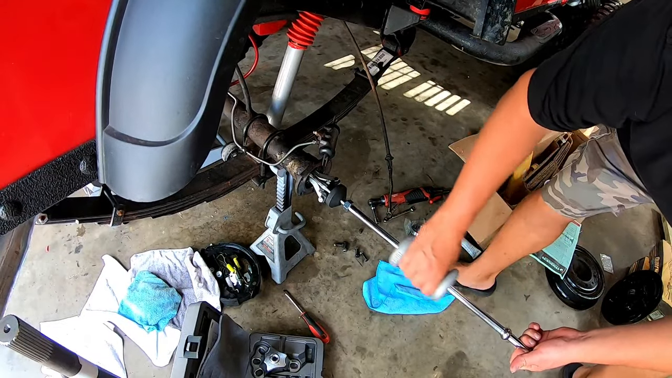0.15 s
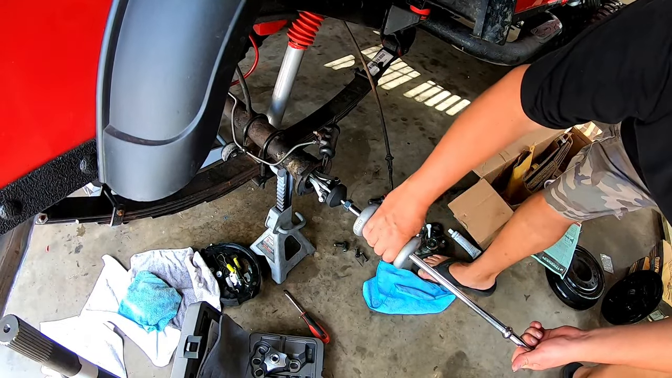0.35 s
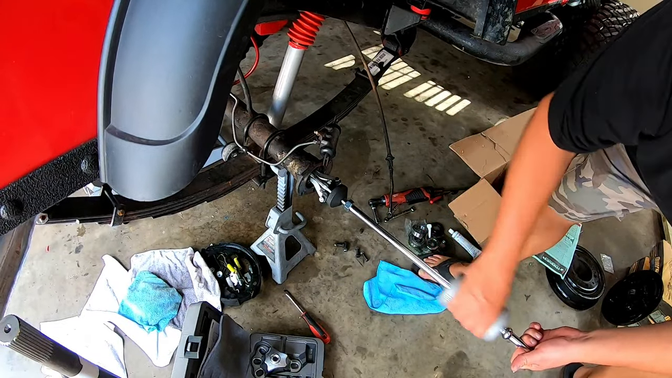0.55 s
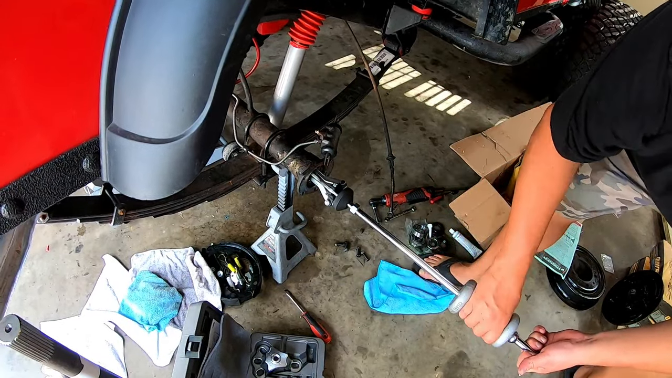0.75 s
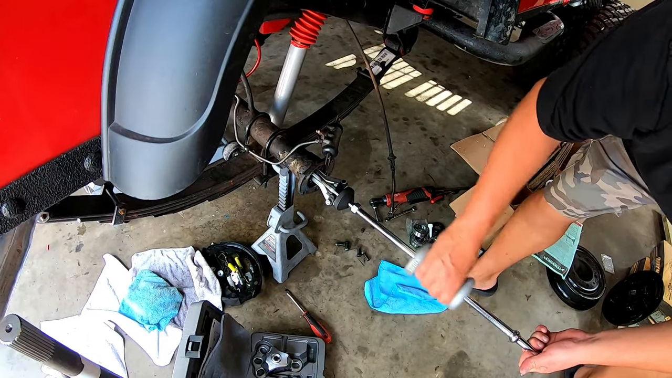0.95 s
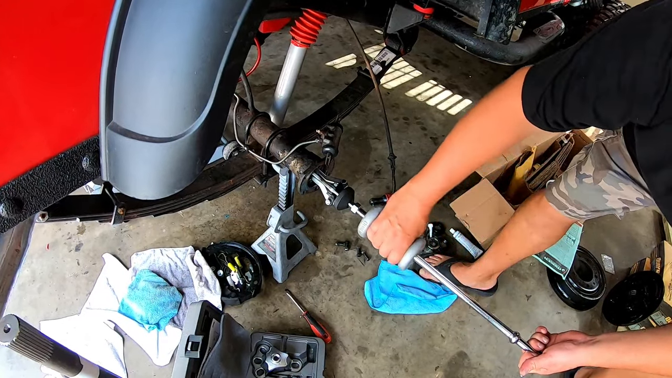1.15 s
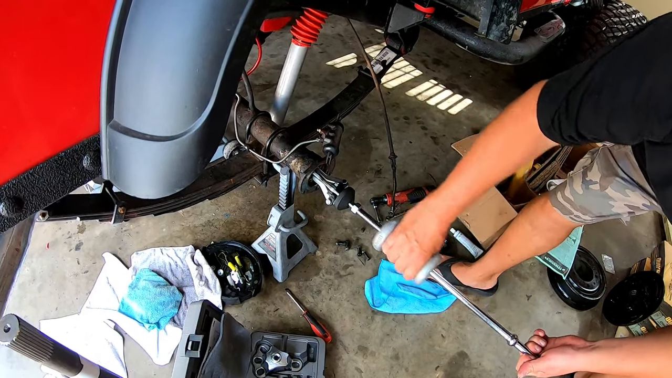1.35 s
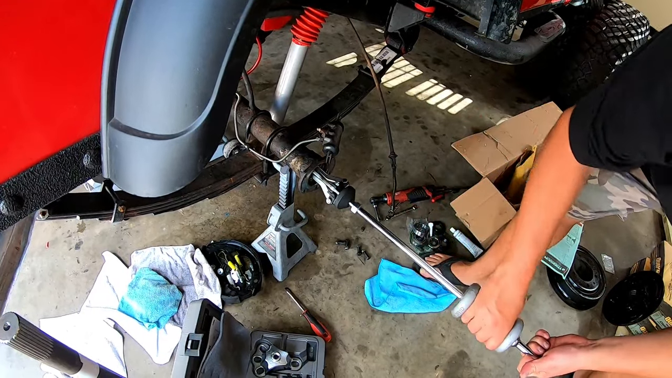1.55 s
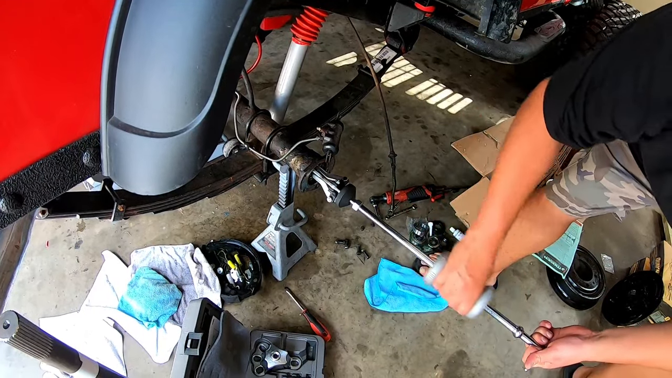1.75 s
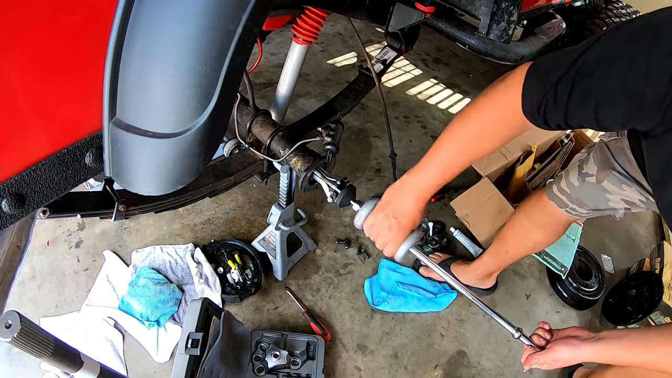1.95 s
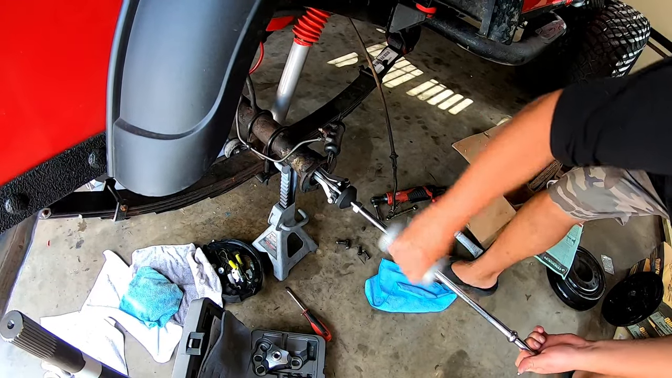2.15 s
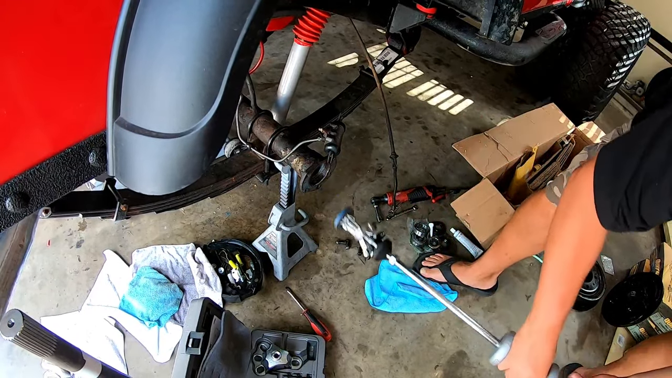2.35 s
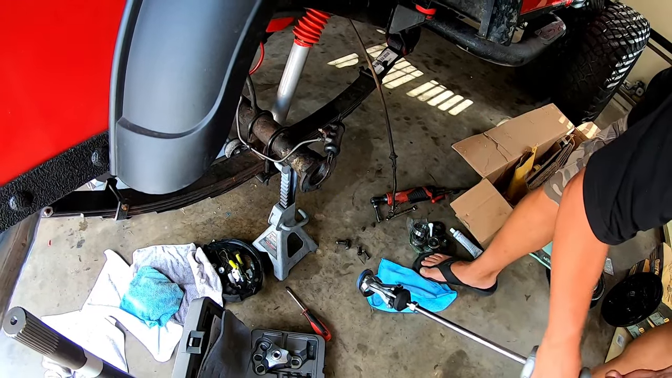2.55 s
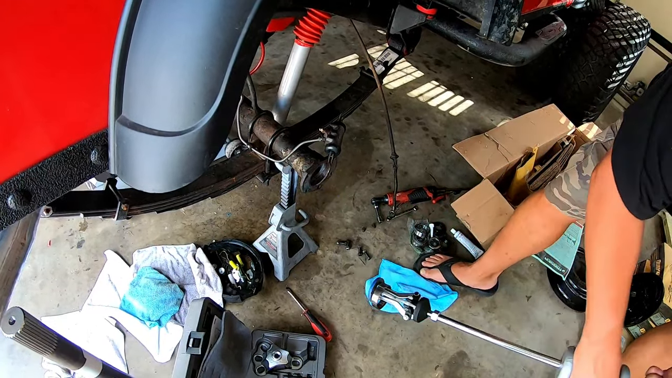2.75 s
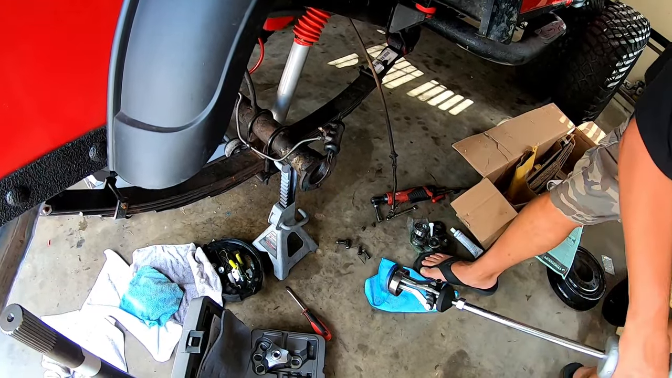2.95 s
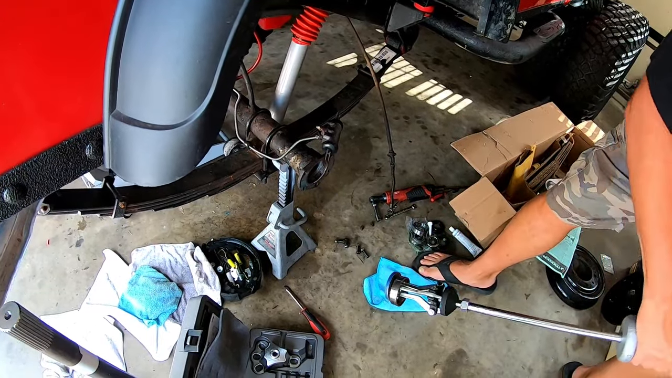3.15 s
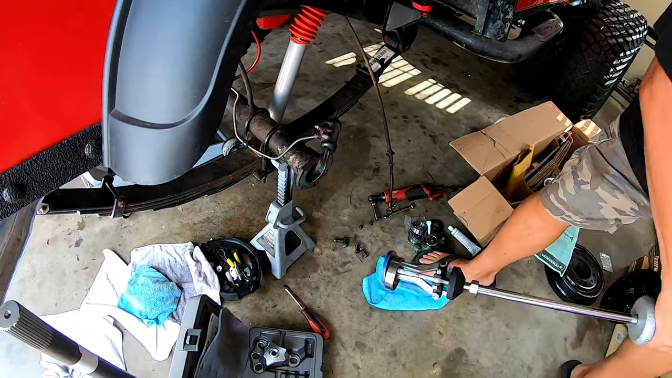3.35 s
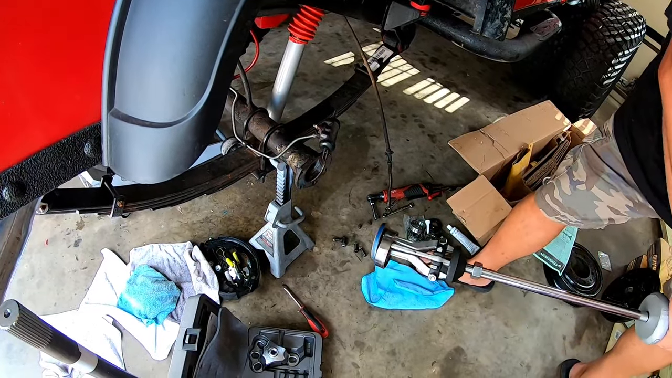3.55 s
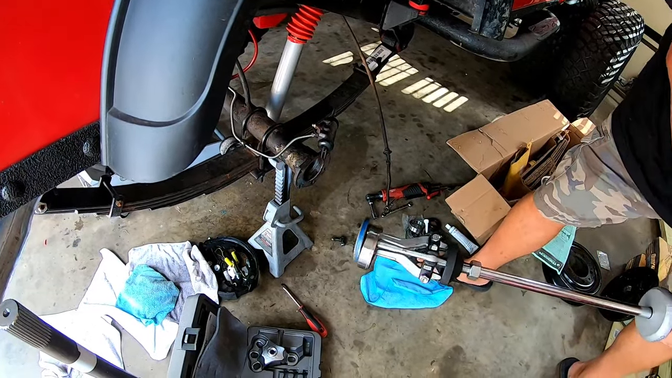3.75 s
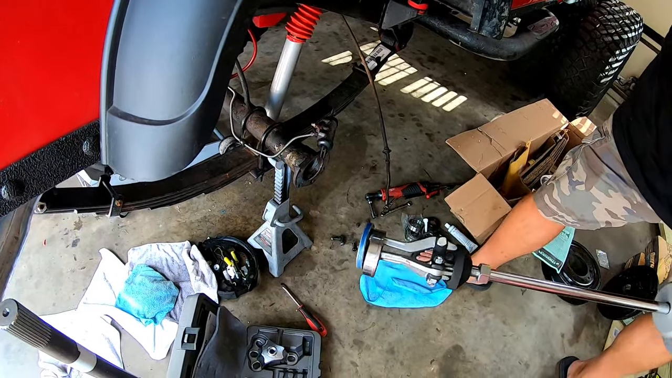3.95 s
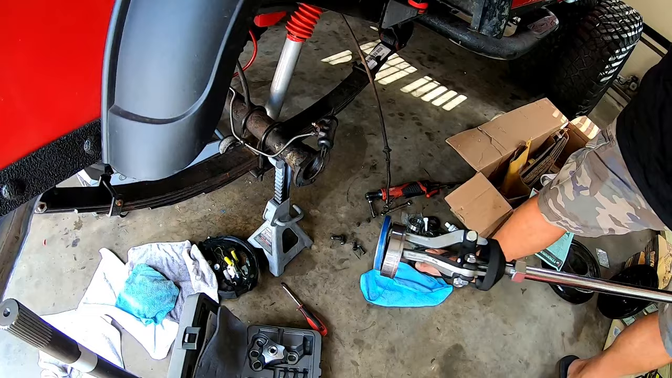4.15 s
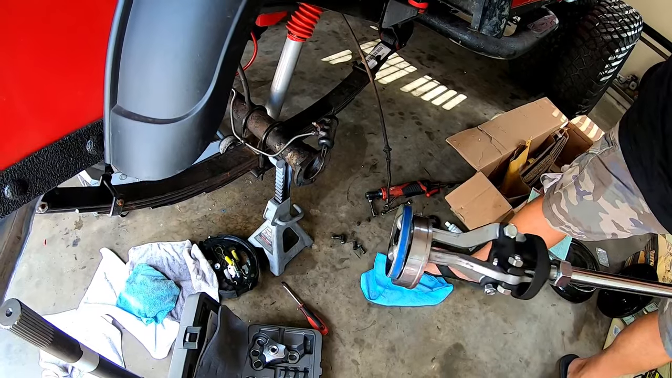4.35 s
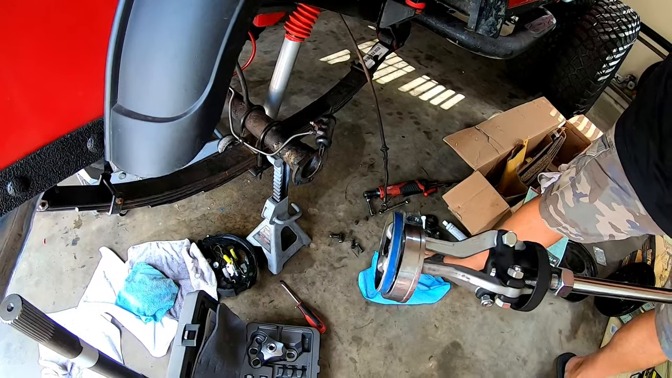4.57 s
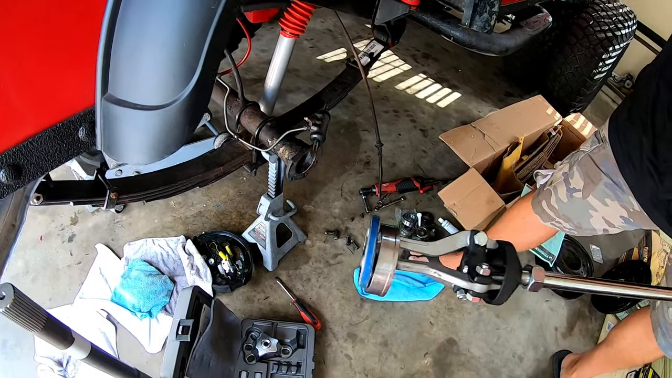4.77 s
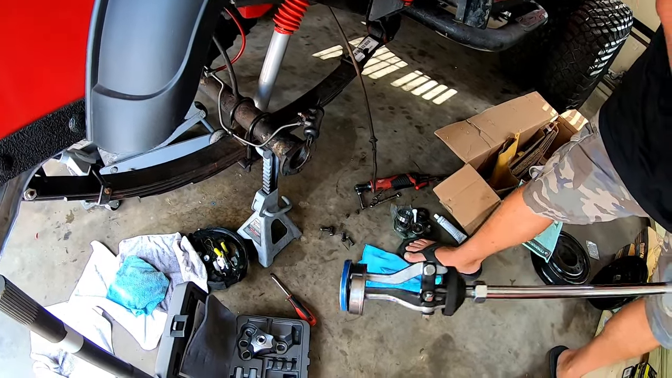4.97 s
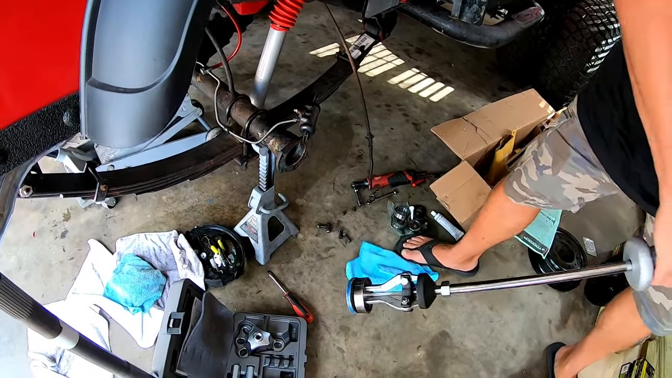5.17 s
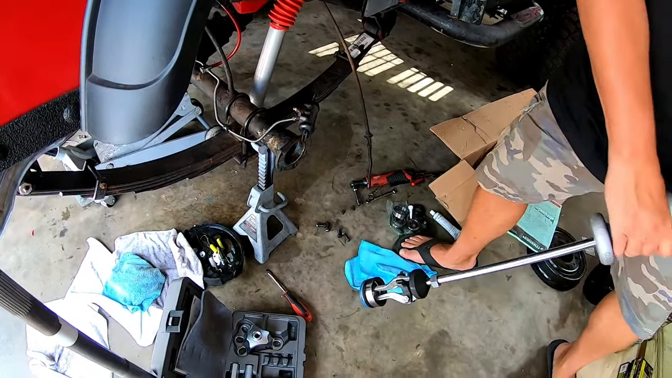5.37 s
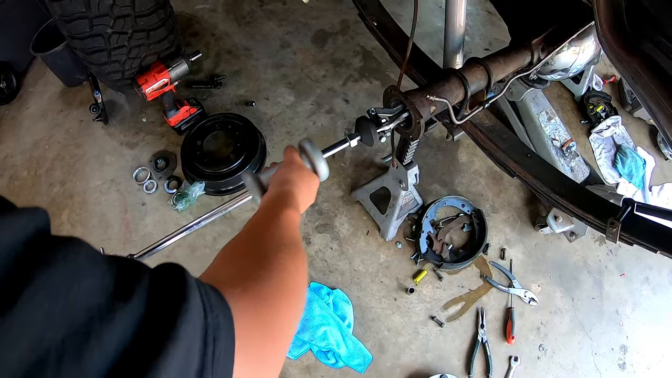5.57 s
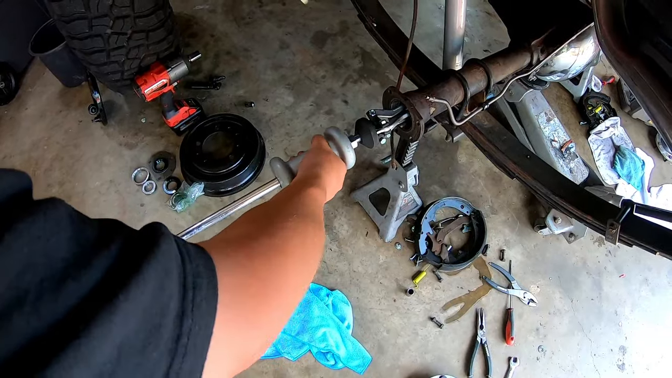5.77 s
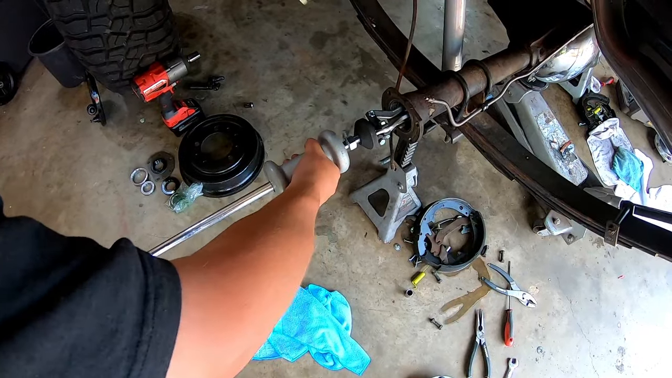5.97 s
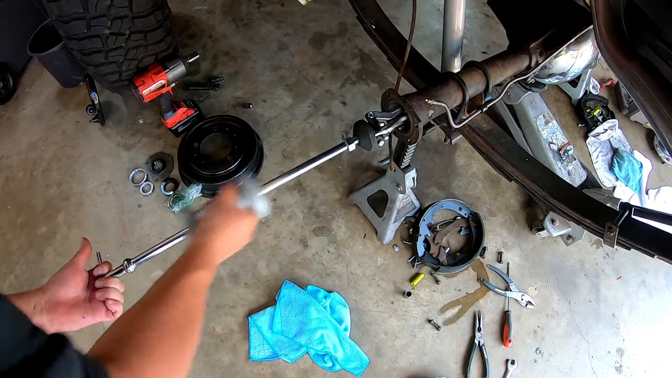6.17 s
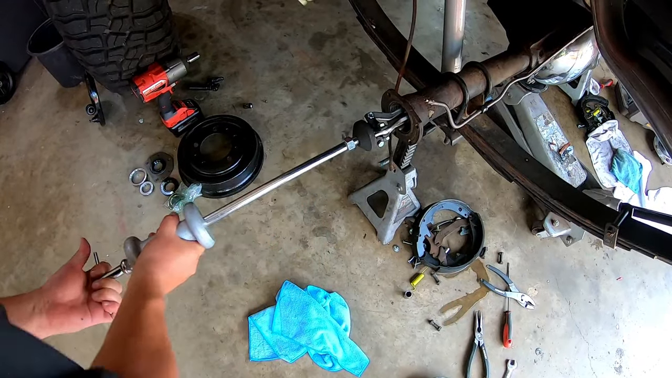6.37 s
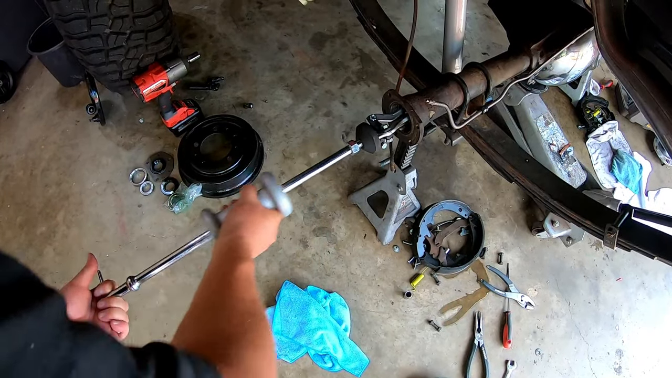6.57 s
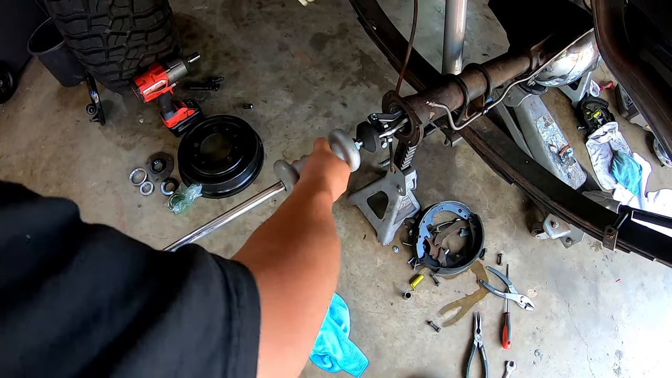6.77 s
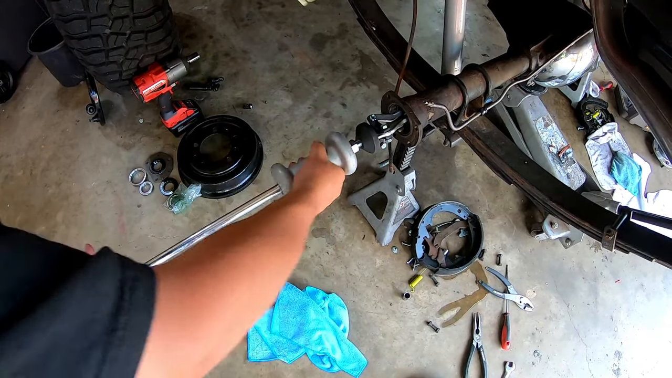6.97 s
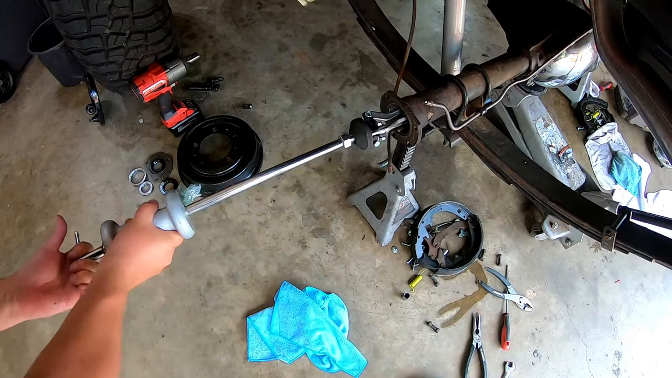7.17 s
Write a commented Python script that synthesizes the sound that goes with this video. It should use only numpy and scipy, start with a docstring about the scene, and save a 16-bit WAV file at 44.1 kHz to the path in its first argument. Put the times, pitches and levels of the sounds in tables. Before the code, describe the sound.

In an open garage, a steel slide hammer pulls at a truck axle. Short rising metal scrapes end in sharp, bright, ringing clacks with a dull body thud, three blows under a second apart. Then about four quieter seconds: light knocks, small clinks of loose jaws, a distant low motor drone and air. Two more scraping blows follow. Close stereo microphone, loud peaks briefly squashed.

```python
"""A slide hammer pulls a bearing from a truck axle in a garage: the weight scrapes along its rod and slams into the stop.
Each blow sums a noise burst for the contact, dense decaying noise for the steel, ringing modes, thud, boom and shake.
The scrape is noise with gliding resonances; light knocks ring the rod, the freed jaws clink, and two small clicks follow.
A far motor (wavering sines and noise) drones over noise for air and rumble; a gain control ducks after loud peaks."""
import sys
import numpy as np
from scipy import signal
from scipy.fft import rfft, irfft, next_fast_len
from scipy.io import wavfile
from scipy.ndimage import uniform_filter1d, map_coordinates

SR = 44100
rng = np.random.default_rng(int(sys.argv[2]) if len(sys.argv) > 2 else 0)


def dump(signal):
    """Clip the signal to [-1, 1] and save it as 16-bit WAV at the path in sys.argv[1]."""
    limited = np.clip(np.atleast_2d(signal).T, -1, 1)
    pcm = np.round(limited * 32767).astype(np.int16)
    wavfile.write(sys.argv[1], SR, pcm)


N = 318402
TIME = np.arange(N) / SR  # s from the start of the scene
AGE = np.arange(SR * 5 // 4) / SR  # s from the start of one impact
TOP_HZ = 15800  # upper band limit

# Modes of rod and weight: pitch_hz, relative level_db, t60_s
ROD_MODES = [(967, -19.5, 0.6), (2049, -16, 0.79), (2556, -11, 0.46), (2920, -12, 0.44), (3070, -3, 0.55),
             (3890, -9, .5), (4016, -1.5, 0.62), (4000, -7, 0.69), (5100, -12.5, 0.34), (6200, -11, .45),
             (7150, -16, 0.45), (7640, -5.5, 0.29), (7800, -1, 0.29), (9500, -15, .25)]
# Modes of the puller jaws hanging free: pitch_hz, relative level_db, t60_s
JAW_MODES = [(1565, -2, .35), (2100, -9, .3), (2600, -7, .4), (3149, -8, .5), (3562, 1, .7), (4740, -4, .4),
             (5905, -4, .7), (6245, -10, .4), (9810, -6, .6), (14212, -30, .5)]
# Where the steel's modes crowd or thin out: pitch_hz, width_hz, change_db
MODE_CLUSTERS = [(2793, 69, 2), (4120, 84, -2.5), (6140, 83, 4), (7750, 530, 11), (8410, 1800, -3.5),
                 (9460, 180, 7.5)]
# Reverberation time of the garage: pitch_hz, t60_s
GARAGE_T60 = [(150, .6), (500, 0.93), (1500, 0.88), (3000, 0.68), (7000, 0.61), (14000, 0.44)]
# Left-right likeness of the ringing and scraping: pitch_hz, correlation (no unit)
RING_ALIKE = [(250, 0.84), (640, 0.9), (1400, 0.31), (3000, 0.89), (6800, 0.052), (12000, 0.11)]
# Left-right likeness of the background: pitch_hz, correlation (no unit)
FLOOR_ALIKE = [(30, 0.79), (100, 1), (200, 1), (600, 0.88), (3000, 0.9)]


def amp(db):
    """Level law: decibels to amplitude gain."""
    return 10 ** (np.asarray(db) / 20)


def unit(x):
    """Power normalisation: scale to rms 1."""
    return x / np.sqrt(np.mean(x ** 2) + 1e-20)


def along(points, hz):
    """Interpolation of (pitch_hz, value) points on a logarithmic frequency axis."""
    point_hz, value = np.transpose(points)
    return np.interp(np.log(hz + 1), np.log(point_hz + 1), value)


def fade(t, t60):
    """Exponential decay of a damped vibration, 60 dB down after t60 seconds."""
    return np.exp(-np.log(1000) * t / np.maximum(t60, 1e-3))


def wobble(rate_hz, size):
    """Random modulation: straight lines between random knots, rate_hz knots a second."""
    knots = rng.standard_normal(int(size * rate_hz / SR) + 4)
    return map_coordinates(knots, [np.arange(size) * rate_hz / SR], order=1)


def add(track, sound, s):
    """Superposition: mix a stereo sound into the track at time s."""
    start = round(s * SR)
    lo, hi = max(start, 0), min(start + sound.shape[1], N)
    if hi > lo:
        track[:, lo:hi] += sound[:, lo - start:hi - start]


def noise(spectrum, alike, size, tilt_db=0, peaks=()):
    """Spectral shaping: rms-1 stereo noise whose mid-side balance sets the left-right correlation."""
    m = next_fast_len(size, True)
    hz = np.fft.rfftfreq(m, 1 / SR)
    # the tilt, in dB per octave, acts above 1 kHz
    db = along(spectrum, hz) + tilt_db * np.log2(np.maximum(hz, 1000) / 1000)
    for centre_hz, width_hz, gain_db in peaks:
        db = db + gain_db / (1 + (2 * (hz - centre_hz) / width_hz) ** 2)
    turn = np.arccos(np.clip(along(alike, hz), -1, 1)) / 2
    spectra = rfft(rng.standard_normal((2, m))) * amp(db) * [np.cos(turn), np.sin(turn)]
    mid, side = irfft(spectra, m)[:, :size]
    return unit(np.array([mid + side, mid - side]))


def blows():
    """Impact: the weight hits the stop and the truck's body thuds; the camera mount shakes."""
    # Hard blows on the stop: start_s, level_db, crack_db, tilt_db_per_octave, strongest_ring_hz, body thud_db,
    # thud_pitch_hz, body boom_db, free jaws_db, right_minus_left_db; part levels are relative
    hard_blows = [(-0.235, -5, 0, 3, 7730, -9.5, 70, -37, -29, 2.5),
                  (0.6908, -13, 11.5, 2.37, 3760, -13.5, 173, -45.5, -51, 1.5),
                  (1.587, -12, 11.5, 1.33, 2700, -5, 135, -27, -40, 2),
                  (2.348, -13.5, 9.5, -0.5, 9780, -10.5, 227, -35, -10, 1),
                  (6.3304, -12.5, 12.5, 1, 2870, -1, 121, -6.5, -33, 0.3),
                  (7.2012, -8, 9.5, -0.5, 3280, -4, 185, -33, -38, -0.5)]
    # Truck body modes: pitch_hz, relative level_db, t60_s
    boom_modes = [(66, 0, 1.2), (131, 3, .4)]
    # Spectrum of the body thud: pitch_hz, relative level_db
    thud_band = [(20, -20), (45, -4), (70, -0.5), (125, -3), (200, -4.5), (260, -12), (350, -26),
                 (600, -36.5), (1500, -93)]
    # Spectrum of the camera mount's low shake: pitch_hz, relative level_db
    shake_band = [(20, -7), (45, -5), (150, -1.5), (300, -10.5), (900, -41.5), (2000, -80.5)]
    out = np.zeros((2, N))
    for s, db, crack_db, tilt_db, centre_hz, thud_db, thud_hz, boom_db, jaws_db, right_db in hard_blows:
        gain = amp(db + right_db * np.array([[-.5], [.5]]))
        steel = amp(-1.5) * clang(tilt_db, early_db=-7, early_t60=0.11, peaks=[(centre_hz, 200, 5)])
        rod = amp(-13) * ring(ROD_MODES, centre_hz, favour_db=2.5, waver_db=4.5)
        jaws = amp(jaws_db) * ring(JAW_MODES, centre_hz, favour_db=7.5, waver_db=9.5)
        thud = noise(thud_band, [(100, .93)], len(AGE), peaks=[(thud_hz, 50, 8)])
        thud = amp(thud_db + 9.0) * thud * fade(AGE, 0.39)
        boom = amp(boom_db) * ring(boom_modes).mean(axis=0)
        body = (thud + boom) * (1 - np.exp(-AGE / 0.011))
        # the shake is partly opposite in the two channels
        shake = amp(-11.0) * noise(shake_band, [(100, -0.46)], len(AGE))
        shake = shake * fade(AGE, .14) * (1 - np.exp(-AGE / 0.0023))
        add(out, gain * (steel + rod + jaws + shake + body), s)
        add(out, gain * amp(crack_db + 4.5) * crack(0, t60=0.022, rise=0.00096), s)
    return out


def crack(tilt_db, t60, rise, peaks=()):
    """Contact transient: stress waves race along the rod, heard as a brief burst; t60 and rise in seconds."""
    # Spectrum of the steel contact: pitch_hz, relative level_db
    contact_band = [(180, -33.5), (300, -17.5), (632, -19), (909, -16.5), (2010, -14), (2710, -1.5),
                    (3040, 2.5), (4520, -14), (5250, -11.5), (7550, -11), (8480, -21), (9670, -7),
                    (10500, -27.5), (12600, -25.5), (15600, -39)]
    # Left-right likeness of the contact: pitch_hz, correlation (no unit)
    contact_alike = [(400, .1), (1300, 1), (2500, 0.33), (3800, 0.49), (5500, .45), (9000, .1)]
    t = AGE[:SR // 10]
    shape = fade(t, t60) * (1 - np.exp(-(t / rise) ** 2))
    burst = noise(contact_band, contact_alike, len(t), tilt_db, peaks) * shape
    return unit(burst) * np.sqrt(np.mean(shape ** 2))


def clang(tilt_db, early_db, early_t60, peaks):
    """High modal density: countless uneven modes merge into noise that decays with the garage's reverberation."""
    # Spectrum of the dense ring of tool and axle: pitch_hz, relative level_db
    clang_band = [(190, -38), (330, -8.5), (590, -12), (958, -11.5), (1070, -13.5), (1260, -11),
                  (1680, -7.5), (3900, -1.5), (4300, -4), (7560, -6.5), (8740, -10.5), (9630, -8),
                  (11000, -19.5), (14700, -29.5), (15600, -58)]
    grid_hz = np.arange(200, TOP_HZ, 70)
    uneven = np.c_[grid_hz, along(clang_band, grid_hz) + 3.6 * rng.standard_normal(len(grid_hz))]
    dense = noise(uneven, RING_ALIKE, len(AGE), tilt_db, MODE_CLUSTERS + peaks)
    hz, t, z = signal.stft(dense, SR, nperseg=256)
    decaying = z * fade(t, along(GARAGE_T60, hz)[:, None])
    tail = signal.istft(decaying, SR, nperseg=256)[1][:, :len(AGE)]
    # the early part shares the tail's decay and fades further by early_t60 (s)
    return tail * (1 + amp(early_db) * fade(AGE, early_t60)) * (1 - np.exp(-AGE / 0.0017))


def ring(modes, centre_hz=3000, favour_db=0, hold=0, waver_db=0, tilt_db=0):
    """Modal synthesis: contact favours modes near centre_hz; a hand damps all by hold dB a second."""
    hz, db, t60 = np.transpose(modes)
    db = db + favour_db / (1 + ((hz - centre_hz) / 200) ** 2)
    db = db + tilt_db * np.log2(np.maximum(hz / centre_hz, 1))
    size = unit(amp(db + 2 * rng.standard_normal(len(hz)))) * np.sqrt(2 / len(hz))
    phase = .6 * rng.standard_normal((2, len(hz)))  # each mode has its own phase in each channel
    turn = (2 * np.pi * hz[:, None] * AGE).astype(np.float32)
    # wall echoes add to each mode and cancel it in turn
    swells = amp(waver_db * rng.standard_normal(size=(len(hz), 70)))
    knots = np.linspace(0, AGE[-1], swells.shape[1])
    waver = np.array([np.interp(AGE, knots, unit(row)) for row in swells], np.float32)
    mode_t60 = np.minimum(t60, AGE[-1])[:, None].astype(np.float32)
    life = waver * fade(AGE.astype(np.float32), mode_t60)
    in_phase = (size * np.cos(phase)) @ (life * np.sin(turn))
    quadrature = (size * np.sin(phase)) @ (life * np.cos(turn))
    return (in_phase + quadrature) * amp(-hold * AGE) * (1 - np.exp(-AGE / .0015))


def slide():
    """Friction: the weight chatters along the rod; its place sets the free length, so bending resonances glide."""
    # Spectrum of the scrape: pitch_hz, relative level_db
    scrape_band = [(290, -37.5), (500, -8), (1320, -13.5), (1960, -0.5), (3180, -4.5), (4050, -3),
                   (4290, -10), (4940, -2), (5460, -16), (6300, -4.5), (8020, -24.5), (8370, -27.5),
                   (9380, -13.5), (10700, -37.5), (15000, -38)]
    level, place = motion()
    modes = [(hz, 60, 5) for hz, _, _ in ROD_MODES]
    chatter = noise(scrape_band, RING_ALIKE, N, peaks=MODE_CLUSTERS + modes)
    hz, t, z = signal.stft(chatter, SR, nperseg=1024)
    length = 1 + .16 * np.interp(t, TIME, place)
    # bending wavenumber grows as the square root of frequency
    bending = np.cos(2 * np.pi * np.sqrt(hz[:, None] / 42) * length)
    # the contact catches and lets go, waking now one mode and now another
    catches = uniform_filter1d(rng.standard_normal(z.shape[1:]), size=4, axis=0)
    catches = unit(uniform_filter1d(catches, size=4, axis=1))
    coloured = z * amp(3.5 * bending + 4 * catches)
    scrape = unit(signal.istft(coloured, SR, nperseg=1024)[1][:, :N])
    flutter = amp(1.8 * wobble(70, N))
    return level * flutter * scrape


def motion():
    """Kinematics: scrape amplitude follows a power of speed; place runs from 0 (axle end) to 1 (stop)."""
    # The weight is flung at the stop, gathering speed all the way: start_s, end_s, full-speed scrape level_db
    pulls = [(0.48, 0.686, -35), (1.386, 1.584, -35.5), (2.11, 2.349, -38.5), (6.11, 6.334, -32.5),
             (7.04, 7.22, -32.5)]
    # The weight is pushed back, speeding up and slowing down: start_s, end_s, full-speed scrape level_db
    returns = [(0.14, 0.5, -44.5), (1.03, 1.33, -53), (1.89, 2.15, -52.5), (5.403, 5.92, -49),
               (6.66, 6.94, -55)]
    pull_power, return_power = 2, 1.83  # exponents of speed
    level, place = np.zeros(N), np.zeros(N)
    for start, end, db in pulls:
        during = (TIME >= start) & (TIME < end)
        speed = (TIME[during] - start) / (end - start)
        level[during] += amp(db) * speed ** pull_power
        place[during] = speed ** 2
    for start, end, db in returns:
        during = (TIME >= start) & (TIME < end)
        swing = np.pi * (TIME[during] - start) / (end - start)
        level[during] += amp(db) * np.abs(np.sin(swing)) ** return_power
        place[during] = (1 + np.cos(swing)) / 2
    return level, place


def garage(x):
    """Diffuse reverberation: convolution with noise that decays at each frequency's own rate."""
    hz, t, z = signal.stft(rng.standard_normal((2, SR)), SR, nperseg=256)
    tail = signal.istft(z * fade(t, along(GARAGE_T60, hz)[:, None]), SR, nperseg=256)[1]
    return signal.fftconvolve(x, tail / np.linalg.norm(tail[0]), axes=1)[:, :N]


def knocks():
    """Damped resonance: the weight bumps the rod and its ends, and the hand damps the ring."""
    # Light knocks: start_s, level_db, crack_db, tilt_db_per_octave, rod_ring_db, strongest_ring_hz;
    # part levels are relative
    rod_knocks = [(0.154, -41, 2.5, -3, -6, 2720), (2.101, -24.5, 0.5, 0, -3.5, 3190),
                  (3.165, -42, -9, -8.5, -3, 4030), (3.235, -40.5, 1, -9, -16, 3170),
                  (3.2414, -29.5, 5.5, -6, -3, 3920), (3.2459, -29, 10, -4.5, -8, 3050),
                  (5.529, -40, -7, -5.5, -29, 4240), (6.223, -35, 1, -5.5, -3, 3970),
                  (6.289, -33.5, -12, -3, 1, 4030), (6.8494, -28, 8, 1.5, -2.5, 4140),
                  (7.087, -44, 5.5, -4, -30, 1780), (7.175, -33.5, 0, 3, -17, 3300)]
    out = np.zeros((2, N))
    for s, db, crack_db, tilt_db, rod_db, centre_hz in rod_knocks:
        rod = ring(ROD_MODES, centre_hz, favour_db=13, hold=15, waver_db=2.5, tilt_db=1.5 * tilt_db)
        add(out, light_contact(db, crack_db, tilt_db, centre_hz, amp(rod_db + 1) * rod), s)
    return out


def light_contact(db, crack_db, tilt_db, centre_hz, ringing):
    """Weak excitation: a tick, a short clang and a modal ring, with the low modes barely moved."""
    colour = [(450, 900, -12), (centre_hz, 300, 7)]  # centre Hz, width Hz, dB
    sound = amp(-5.5) * clang(tilt_db, early_db=8, early_t60=0.16, peaks=colour) + ringing
    tick = amp(crack_db + 5.5) * crack(tilt_db, t60=.035, rise=.0006, peaks=colour)
    padded = np.pad(tick, [(0, 0), (0, len(AGE) - tick.shape[1])])
    return amp(db) * (sound + padded)


def clinks_and_clicks():
    """Damped modes: the freed jaws clink and rattle at random; two small clicks borrow the same modes."""
    # Light events, jaw clinks first and two small clicks last: start_s, level_db, crack_db, tilt_db_per_octave,
    # modal_ring_db, strongest_ring_hz; part levels are relative
    light_events = [(2.777, -58, 10.5, -12.5, -14, 2550), (2.8136, -46.5, 5, -6.5, -1, 3670),
                    (2.908, -51, 0.5, -3.5, -15, 5280), (3.115, -64.5, 1.5, -11.5, 10, 2500),
                    (3.886, -64, -2.5, -15, -4, 3580), (4.018, -49, -0.5, -10, 4.5, 4640),
                    (4.039, -46.5, 4.5, -8, -1.5, 3560), (4.217, -60, 1.5, -12.5, -13, 2620),
                    (4.688, -67.5, -2.5, -10.5, -6.5, 3580), (4.924, -63, 8, -12, -8.5, 3630),
                    (5.189, -65.5, 1.5, -10, -9, 3570), (5.384, -54.5, -9, -1, -14, 4500),
                    (5.406, -59.5, 14, -10.5, -11, 4330)]
    jaw_clinks, small_clicks = light_events[:-2], light_events[-2:]
    # The jaws stir faintly while the puller is turned in the hand: first_s, last_s
    stir_span = (3.55, 5.3)
    softest_db = -71.5
    out = np.zeros((2, N))
    first, last = stir_span
    rattle = []
    for when, force in rng.random(size=(6, 2)):
        rattle.append((first + (last - first) * when, softest_db + 4 * force, 2, -11, -3, 3550))
    for s, db, crack_db, tilt_db, ring_db, centre_hz in jaw_clinks + small_clicks + rattle:
        ringing = ring(JAW_MODES, centre_hz, favour_db=5, hold=150, waver_db=4, tilt_db=tilt_db)
        add(out, light_contact(db, crack_db, tilt_db, centre_hz, amp(ring_db) * ringing), s)
    return out


def background():
    """Tonal and broadband sources: a far motor's wavering lines and noise over the open garage's air."""
    # Motor drone lines: pitch_hz, relative level_db
    motor_lines = [(155, 0.5), (173, -2), (206, 1.5), (226, -2.5), (258, -15)]
    # Spectrum of the drone's noise: pitch_hz, relative level_db
    drone_band = [(90, -29.5), (150, -2.5), (210, 3), (260, -11), (420, -16), (700, -57)]
    # Course of the far motor: time_s, level_db
    drone_course = [(0, -56), (3.1, -55), (3.5, -48), (6.2, -50.5), (6.8, -63)]
    # Spectrum of the air: pitch_hz, relative level_db
    air_band = [(12, -50), (20, -21), (66, -9), (119, -18), (153, -7), (208, -8.5), (417, -19),
                (551, -30.5), (749, -26.5), (1050, -31), (1630, -28.5), (2420, -38.5), (3570, -46.5),
                (5570, -49.5), (15600, -90.5)]
    # Course of the air: time_s, level_db
    air_course = [(0, -56.5), (3.4, -57), (4.5, -54), (5.7, -49.5), (7.22, -54.5)]
    lines = np.zeros(N)
    for hz, db in motor_lines:
        lines += amp(db + 4 * wobble(4, N)) * np.sin(2 * np.pi * hz * TIME + 2 * wobble(9, N))
    drone = amp(-2.0) * unit(lines) + amp(-7) * noise(drone_band, FLOOR_ALIKE, N)
    drone = amp(np.interp(TIME, *np.transpose(drone_course))) * drone
    air = amp(np.interp(TIME, *np.transpose(air_course))) * noise(air_band, FLOOR_ALIKE, N)
    return drone + air


def rumble():
    """Amplitude-modulated low noise: an uneven rumble sinks in the hammering's pause, where one soft swell passes."""
    # Spectrum of the rumble: pitch_hz, relative level_db
    rumble_band = [(15, -15), (32, -7), (70, -1), (110, 0.5), (170, -26), (400, -68)]
    # Spectrum of the very low swell: pitch_hz, relative level_db
    swell_band = [(15, -9.5), (32, 2), (65, -8), (130, -31.5), (400, -80)]
    work_db, rest_db = -55.5, -67.5  # mean levels while hammering and in the pause
    pause_from_s, pause_to_s, pause_fade_s = 2.6, 5.88, .4
    swell_s, swell_width_s, swell_db = 4.2, .14, -47
    inside_s = np.minimum(TIME - pause_from_s, pause_to_s - TIME)
    resting = np.clip(.5 + inside_s / pause_fade_s, 0, 1)
    db = work_db + (rest_db - work_db) * resting + 2.2 * wobble(4, N)
    steady = amp(db) * noise(rumble_band, [(30, 0.33), (90, 0.93)], N)
    swell = amp(swell_db) * np.exp(-((TIME - swell_s) / swell_width_s) ** 2)
    return steady + swell * noise(swell_band, FLOOR_ALIKE, N)


def scene():
    """Superposition of all sources, with the garage's answer to the scrape."""
    scrape = slide()
    hammer = blows() + scrape + amp(-7.5) * garage(scrape)
    return hammer + knocks() + clinks_and_clicks() + background() + rumble()


def gain_control(x, threshold_db, release_db, attack_s):
    """Dynamic compression: loud peaks cut the gain in milliseconds; it climbs back by release_db a second."""
    power = uniform_filter1d(np.mean(x ** 2, axis=0), size=130)  # averaged over about 3 ms
    level_db = 10 * np.log10(np.abs(power) + 1e-12)
    climb = release_db * TIME
    cut_db = np.maximum.accumulate(np.maximum(level_db - threshold_db, 0) + climb) - climb
    keep = np.exp(-1 / (attack_s * SR))
    return x * amp(-signal.lfilter([1 - keep], [1, -keep], cut_db))


def record(dry):
    """Compression, clipping at full scale, then low-pass band limitation."""
    wet = np.clip(gain_control(dry, threshold_db=-16, release_db=72.0, attack_s=0.0049), -1, 1)
    m = next_fast_len(N + SR // 2)
    edge = np.interp(np.fft.rfftfreq(m, 1 / SR), [TOP_HZ - 400, TOP_HZ + 200], [1, 0])
    return irfft(rfft(wet, m) * edge, m)[:, :N]


dry = scene()
out = record(dry)
dump(out)
```